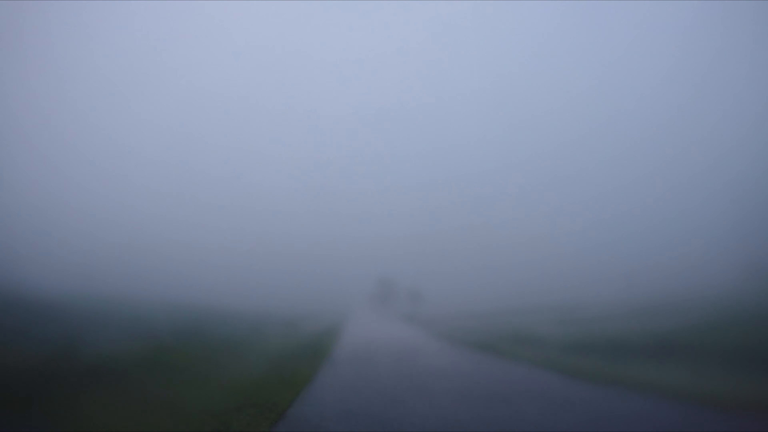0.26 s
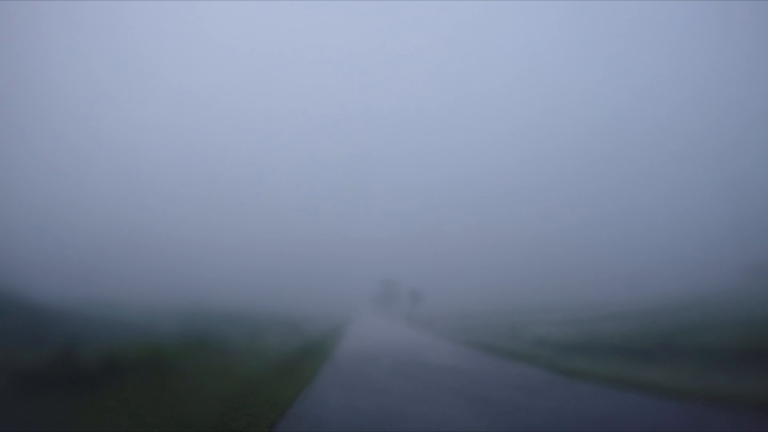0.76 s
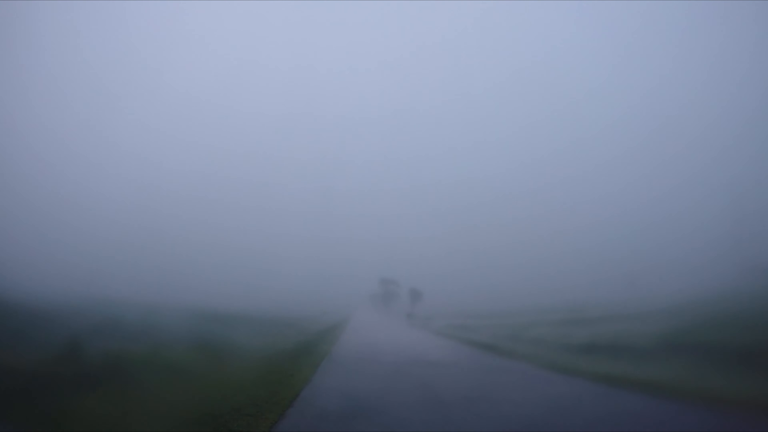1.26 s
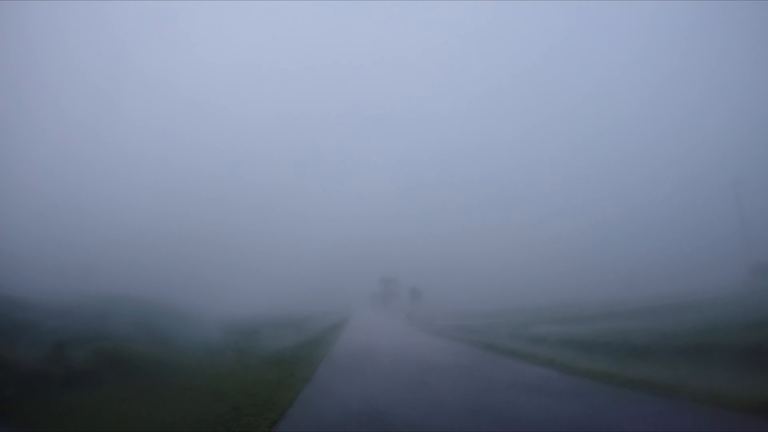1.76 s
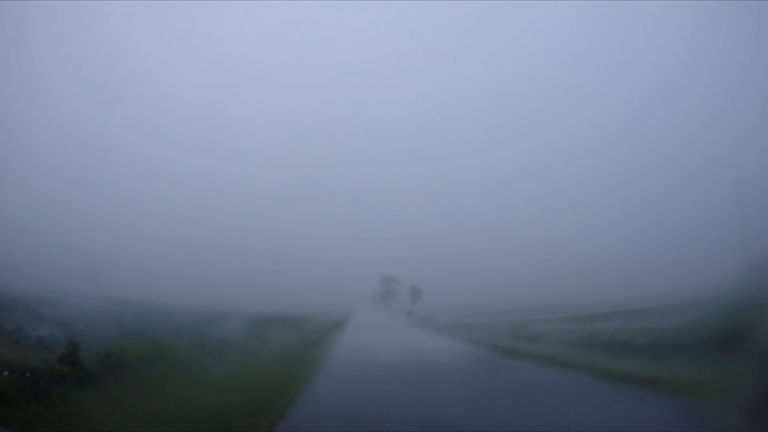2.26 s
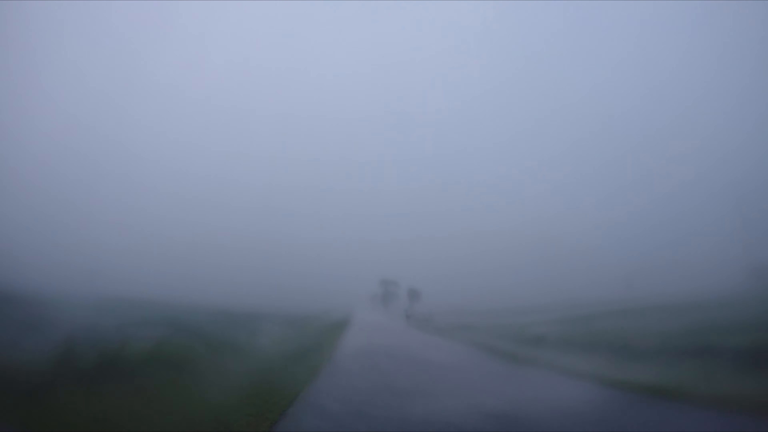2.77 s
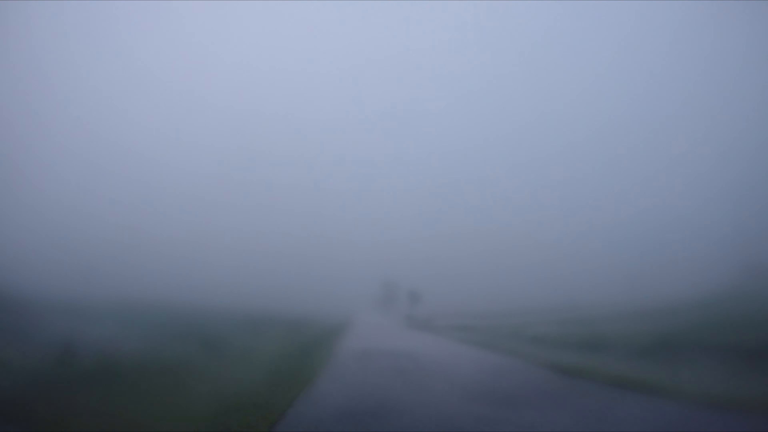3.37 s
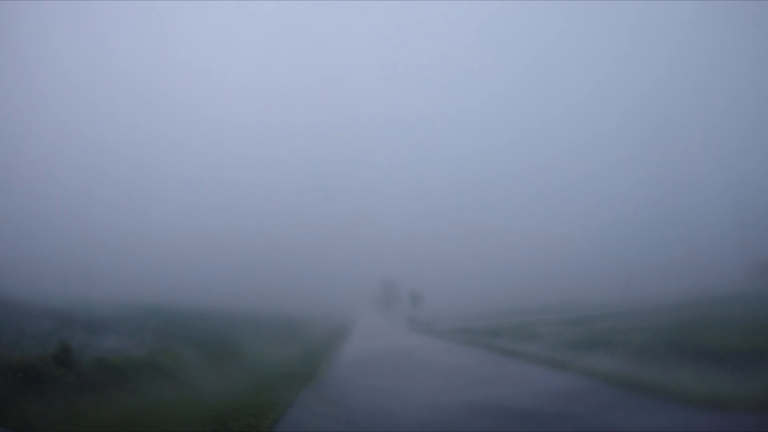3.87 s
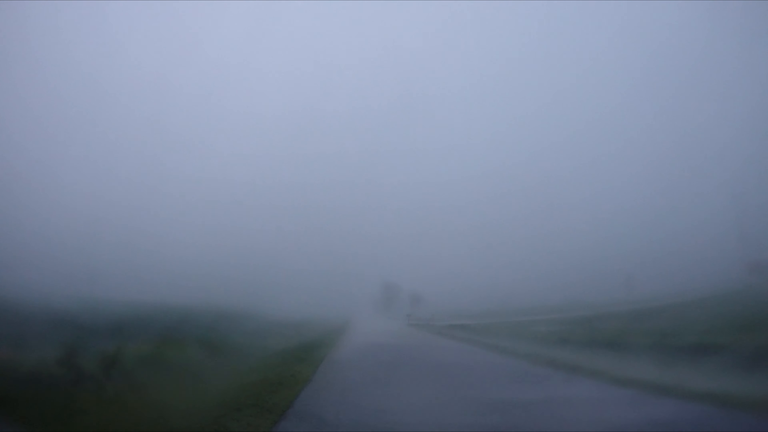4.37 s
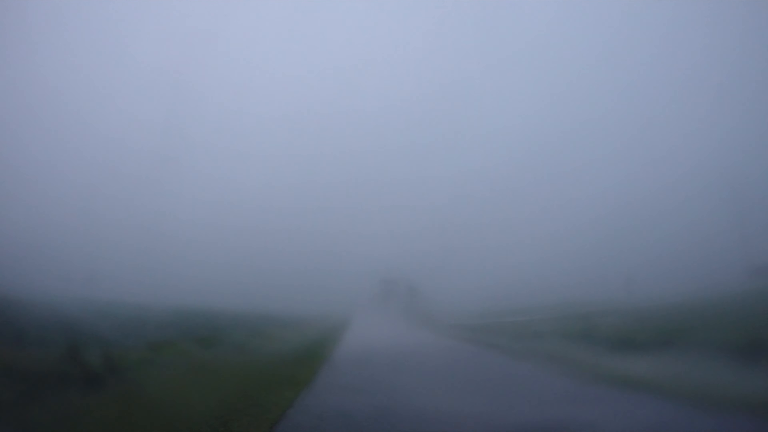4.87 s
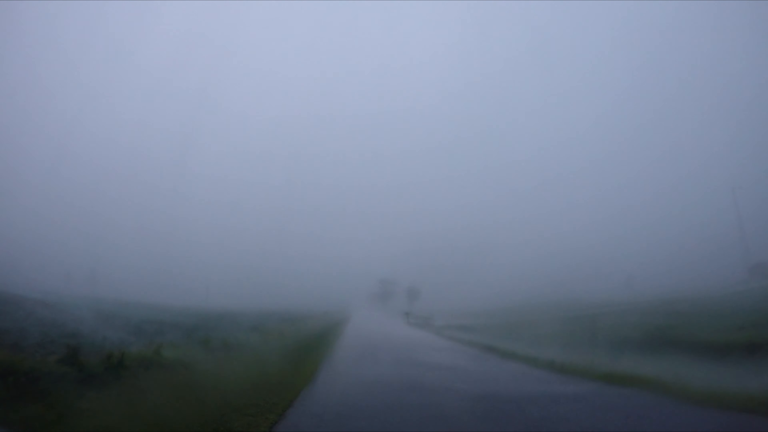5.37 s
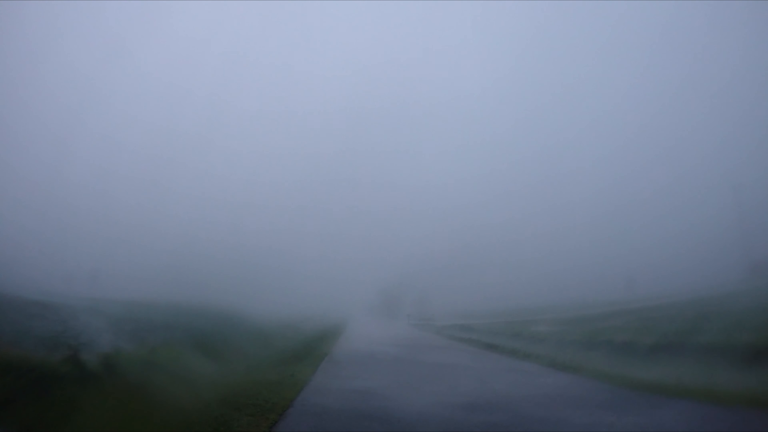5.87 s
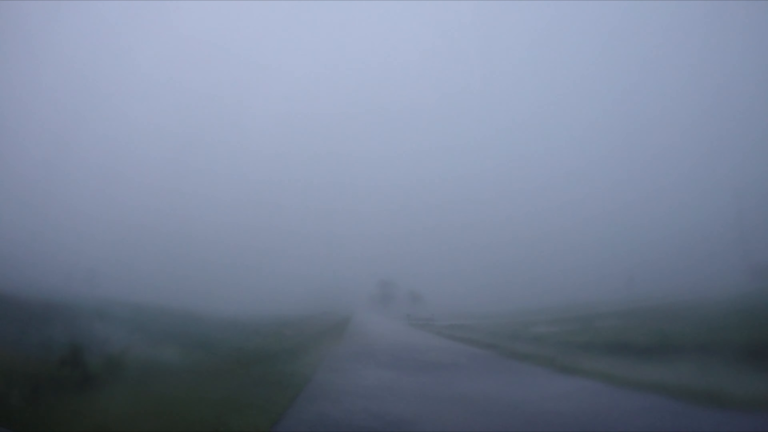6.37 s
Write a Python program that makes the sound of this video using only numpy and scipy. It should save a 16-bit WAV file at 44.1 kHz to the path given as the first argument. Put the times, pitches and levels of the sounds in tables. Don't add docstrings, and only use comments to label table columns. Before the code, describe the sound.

Rain heard from inside a parked car, close and dry, with no engine. From 0 to 1 s big drops smack the windscreen, bonnet and mount thickly and irregularly: bright crack, short woody knock around 2 kHz, some higher glassy ticks, a small bass thud under heavy ones. A low gust fades at the start. From 1 to 2.4 s hits are a little more spaced, with a very strong one near 1.9 s. A gust bumps at 2.5 s and drops crowd together until 3.8 s, with a dense patter burst near 3.4 s. About 3.9 to 4.3 s is thinner, with a brief faint whistle at 4.1 s. Gusts rumble and rush from 4.3 to 5.2 s under another hard cluster. Hits grow sparse from 5.6 to 6.2 s, leaving light taps and faint hiss; then wind swells and heavy knocks return until 6.6 s.

```python
import sys
import numpy as np
from scipy import signal
from scipy.fft import rfft, irfft
from scipy.io import wavfile

SR = 44100
rng = np.random.default_rng(int(sys.argv[2]) if len(sys.argv) > 2 else 0)


def transcribe(signal):
    frames = np.atleast_2d(signal).T
    limited = np.clip(frames, -1, 1)
    pcm = np.round(limited * 32767).astype(np.int16)
    wavfile.write(sys.argv[1], SR, pcm)


def undo_db(level):
    steps = np.asarray(level, float) / 20
    return 10 ** steps


N = 292383


def rms_one(x):
    return x / np.sqrt(np.mean(x ** 2) + 1e-20)


def in_time(rows):
    start_s, *columns = np.transpose(rows)
    return [np.interp(np.arange(N) / SR, start_s, column) for column in columns]


def drift(rate_hz):
    r = np.exp(-80 * np.pi * rate_hz / SR)
    noise = rng.standard_normal(N // 40 + 2002)
    slow = signal.lfilter([1], [1, -2 * r, r * r], noise)[2000:]
    return np.interp(np.arange(N) / 40, np.arange(len(slow)), rms_one(slow))


def coloured(x, spectrum):
    hz = np.maximum(np.arange(N // 2 + 1) * SR / N, 1)
    point_hz, point_db = np.transpose(spectrum)
    gain_db = np.interp(np.log(hz), np.log(point_hz), point_db)
    return irfft(rfft(x) * undo_db(gain_db), N)


def band(x, low_hz, high_hz):
    return signal.sosfilt(signal.butter(2, [low_hz, high_hz], "band", fs=SR, output="sos"), x)


def high_pass(x, order, hz):
    return signal.sosfilt(signal.butter(order, hz, "high", fs=SR, output="sos"), x)


def low_pass(x, order, floor_db, hz):
    return signal.sosfilt(signal.cheby2(order, floor_db, hz, fs=SR, output="sos"), x)


def impulses(start_s, sizes):
    at = np.clip(start_s * SR, 0, N - 1).astype(int)
    return np.bincount(at, sizes, N) + 1e-18


def ring(clicks, hz, t60_s):
    r, w = undo_db(-60 / (t60_s * SR)), 2 * np.pi * hz / SR
    return signal.lfilter([0, np.sin(w)], [1, -2 * r * np.cos(w), r * r], clicks)


# pitch_hz, level_db [dB per Hz]
RUMBLE_COLOUR = [(11, 3), (18, 29), (40, 23), (59, 7), (88, 9), (188, -1.5), (297, 1.5), (480, -29),
                 (600, -29), (780, -52), (1320, -120)]
# pitch_hz, level_db, t60_s
CABIN_BOOMS = [(32.94, 1.5, 1), (54.6, -1.5, 0.8), (77.3, -4, 0.18), (130.3, -14.5, 0.18),
               (301.6, -21.5, 0.22)]
# pitch_hz, level_db, t60_s
GAP_TONES = [(826, 3, 0.0099), (1053, 0.5, 0.025), (1612, -6, 0.02), (2080, 0.5, 0.0048), (2600, -2, 0.028)]


def wind(rumble_db, rush_db):
    white = rng.standard_normal((3, N))
    gust_db = np.minimum(rumble_db, -30)
    swell_db = gust_db + 38.5
    booms = 0
    for k, (hz, db, t60_s) in enumerate(CABIN_BOOMS):
        share = np.clip(1.15 - hz / 500, 0.4, 1)
        booms += undo_db(db - 38.5 + share * swell_db) * rms_one(ring(white[1 + k % 2], hz, t60_s))
    rumble_level_db = 3.9 * drift(3.0) - 43.5 + 0.79 * swell_db
    rumble = rms_one(coloured(white[0], RUMBLE_COLOUR)) * undo_db(rumble_level_db)
    low = high_pass(undo_db(-1.5) * booms + rumble, 2, 27)

    rush = 0
    for k, (hz, db, t60_s) in enumerate(GAP_TONES):
        flutter = undo_db(3 * drift(14))
        rush += undo_db(db) * flutter * rms_one(ring(white[k % 3], hz, t60_s))
    rush = low_pass(band(rush, 926, 2800), 8, 30, 2900)
    rush = high_pass(rush, 3, 660)
    return low + undo_db(np.maximum(rush_db, -50) - 2.5) * rms_one(rush)


# pitch_hz, level_db [dB per Hz]
SPRAY_COLOUR = [(1470, -11.5), (2500, -13), (3660, -10.5), (4840, -2), (6290, -17), (7190, -14),
                (15000, -18.5)]


def spray(level_db):
    hiss = rms_one(coloured(rng.standard_normal(N), SPRAY_COLOUR))
    flicker_db = 3.2 * drift(40) + 5.9 * drift(170)
    return (undo_db(level_db + flicker_db) + undo_db(-81.0)) * hiss


def splash(start_s, db, t60_s):
    fade = undo_db(-60 / (t60_s * SR))
    shape = signal.lfilter([1], [1, -fade], impulses(start_s, undo_db(db)))
    return shape * rng.standard_normal(N)


def spot_ring(start_s, db, hz, t60_at_2k_s, rise_ms, sag):
    t = np.arange(700) / SR
    luck = 0.7 + 0.6 * rng.random((len(start_s), 1))
    t60_s = t60_at_2k_s * luck * np.sqrt(2000 / hz[:, None])
    shape = (1 - np.exp(-t / (rise_ms / 1000))) * undo_db(-60 * t / t60_s)
    sine = np.sin(2 * np.pi * hz[:, None] * t * (1 + sag * (0.0015 - t)))
    tones = undo_db(db)[:, None] * shape * sine
    at = (start_s * SR).astype(int)[:, None] + np.arange(len(t))
    return np.bincount(at.ravel(), tones.ravel(), N + len(t))[:N]


# pitch_hz, level_db, t60_s
PANEL_MODES = [(291, -15.5, 0.061), (703, -24.5, 0.059), (852, -21.5, 0.046), (1080, -8.5, 0.022),
               (1557, -5, 0.018), (1910, 2, 0.0053), (2026, -7, 0.028), (2170, -1.5, 0.0042),
               (2655, -2.5, 0.016), (3183, -4.5, 0.011), (4180, -3, 0.0092), (4763, -1.5, 0.0078),
               (5520, -13, 0.011), (7110, -6.5, 0.0054)]


def panel(start_s, db, scatter_db, smear_ms):
    out = np.zeros(N)
    chance = rng.standard_normal((len(start_s), len(PANEL_MODES)))
    smear, side = rng.random((2, len(start_s), len(PANEL_MODES)))
    for k, (hz, mode_db, t60_s) in enumerate(PANEL_MODES):
        late_s = 0.45 / hz + smear_ms / 1000 * smear[:, k] ** 2
        sizes = undo_db(db + mode_db + scatter_db * chance[:, k]) * np.sign(side[:, k] - 0.5)
        out += ring(impulses(start_s + late_s, sizes), hz, t60_s)
    return out


def patter(level_db, spread_db, crack_db):
    draw = rng.random((6000, 2))
    start_s = draw[:, 0] * N / SR
    clump_db = 1.2 * drift(22)[(start_s * SR).astype(int)]
    size = np.minimum(-np.log(draw[:, 1] + 1e-9), 1.5)
    db = spread_db * size + clump_db
    rings = panel(start_s, db, scatter_db=5.5, smear_ms=0.8)
    burst_db = db + 4.8 * rng.standard_normal(len(start_s))
    cracks = band(splash(start_s, burst_db, t60_s=0.0012), 4900, 15700)
    lands_on = rng.integers(len(PANEL_MODES), size=len(start_s))
    spot_hz, spot_db = np.array(PANEL_MODES)[lands_on, :2].T
    pings = spot_ring(start_s, db + spot_db, spot_hz, t60_at_2k_s=0.0047, rise_ms=0.3, sag=2.4)
    mix = rms_one(rings) + undo_db(3.0) * rms_one(pings) + undo_db(crack_db) * rms_one(cracks)
    return undo_db(level_db) * mix


def big_drops(start_s, db, hz, crack_db, spread_db):
    crack = band(splash(start_s, db + crack_db + 0.2, t60_s=0.0025), 2370, 11560)
    body = band(splash(start_s, db + spread_db - 15.0, t60_s=0.02), 1280, 3750)
    spot_t60_s = 0.0076 * undo_db(-0.7 * spread_db)[:, None]
    spot = spot_ring(start_s, db - 0.8 - 1.27 * spread_db, hz, spot_t60_s, rise_ms=0.071, sag=1.9)
    modes = panel(start_s, db + 0.44 * spread_db - 12.5, scatter_db=3.0, smear_ms=0.7)
    return spot + modes + crack + body


# start_s, peak_db, crack_db [dB re peak]
ROOF_HITS = [
    (1.0583, -18.5, -10),
    (2.2708, -19, -24),
    (2.5498, -22, -1),
    (3.8174, -17, -14),
    (4.7214, -19, 3.5),
    (4.9797, -11.5, -6),
    (6.6255, -15.5, -19),
]
# start_s, peak_db, crack_db [dB re peak]
BONNET_HITS = [(0.077, -13.5, -24), (0.2271, -10.5, -15), (0.272, -15, -22), (0.5314, -31, 13),
               (0.5988, -18, -12), (0.8708, -18, -26), (1.2372, -12.5, -19), (1.2611, -13, -10),
               (1.6386, -9.5, -13), (2.1055, -11.5, -14), (2.174, -20, -3), (2.284, -17, -19),
               (2.5709, -5, -18), (2.8913, -12.5, -12), (3.159, -13.5, -17), (3.289, -17, -24),
               (3.4133, -18, -19), (3.425, -11, -28), (3.636, -11, -11), (4.021, -20, -7),
               (4.6764, -14.5, -15), (4.7919, -13, -3), (6.2676, -15.5, -28), (6.4764, -9.5, -8),
               (6.5001, -6, -31), (6.563, -11.5, -23.5)]
# start_s, peak_db, crack_db [dB re peak]
LOW_GLASS_HITS = [(0.0017, -11.5, -5), (0.195, -11, -13), (0.2751, -13, -19), (0.408, -6.5, -10),
                  (0.696, -9.5, -17), (0.92, -7, -31), (0.968, -8, -11), (1.1859, -10, -14),
                  (1.4158, -7, -16), (2.0841, -6, -12), (2.5359, -19, -7), (2.6315, -14, -8),
                  (2.7354, -17, -18), (2.8498, -9, -5), (2.905, -3, -21), (3.4053, -8.5, -7),
                  (3.5405, -13.5, -4), (3.7543, -16, -14), (4.218, -17, -31), (4.355, -13, -13),
                  (4.8113, -12, -2), (5.0287, -12, -19), (5.234, -17, -8), (5.3842, -11.5, -4),
                  (5.4842, -12.5, -19), (5.634, -11, -22), (5.65, -11, -10), (5.8978, -21.5, -17),
                  (6.5116, -4.5, -19), (6.552, -11, -13)]
# start_s, peak_db, crack_db [dB re peak]
CLEAN_GLASS_HITS = [(0.133, -11, -26), (0.259, -6.5, -18), (0.357, -5.5, -23), (0.428, -6, -24),
                    (0.6186, -4, -23), (1.0033, -18, -1), (1.141, -7.5, -6), (1.5746, -12.5, -9),
                    (1.794, -7.5, -11), (2.1296, -6, -15), (2.329, -7.5, -34), (2.594, -3, -7),
                    (2.742, -16, -26), (2.882, -4.5, -24), (2.9228, -8, 5), (2.9858, -8, -10),
                    (3.1687, -11.5, -19), (3.4679, -4.5, -27), (3.5195, -8, -5.5), (4.396, -3, -10),
                    (4.553, -3, -12), (4.607, -23, -19), (4.6657, -7.5, -10), (4.9574, -7.5, -22),
                    (5.0107, -12.5, -20), (5.0906, -4.5, -20), (5.491, -18, -13), (6.2331, -9.5, -5)]
# start_s, peak_db, crack_db [dB re peak]
SMEARED_GLASS_HITS = [(0.2845, -12, -18), (0.3073, -8.5, -5), (0.9387, -9.5, -27), (1.1798, -14.5, -5),
                      (1.245, -5, -31), (1.32, -9.5, -22), (1.37, -15, 0.5), (1.6179, -0.5, -35),
                      (3.0787, -13, -9), (3.0911, -2.5, 0), (3.1157, -14, 1), (3.3565, -7, -14),
                      (3.699, -8, -8), (3.8287, -12.5, -18), (4.3064, -18, 4.5), (4.352, -30, -21),
                      (4.564, -15, -12), (5.0744, -28.5, 11), (5.3503, -7, -2.5), (5.481, -16, -4),
                      (5.7196, -10.5, -11), (6.454, -6.5, -14)]
# start_s, peak_db, crack_db [dB re peak]
HIGH_GLASS_HITS = [(0.0716, -9.5, -0.5), (0.148, -3.5, -11), (0.491, -11, -3), (0.5845, -4.5, -7),
                   (0.61, -7.5, -27), (0.6398, -8, -24), (0.7155, -17, -6), (1.4429, -14, -3),
                   (1.4822, -9.5, -10), (1.9752, -12, -24), (2.0121, -9.5, -16), (2.076, -12.5, -17),
                   (2.1888, -6.5, -23), (2.3684, -8, -10), (2.3867, -9.5, -8), (2.4878, -11, -8),
                   (2.7555, -3.5, -3), (3.0448, -6.5, -15), (3.2732, -2.5, -14), (3.6491, -7, -17),
                   (4.0469, -9, -17), (4.852, -9, -5), (5.1163, -5, -8), (5.525, -16, -12),
                   (6.5755, -7, -23)]
# start_s, peak_db, crack_db [dB re peak]
MOUNT_HITS = [(0.1814, -13.5, -5.5), (0.2174, -10, -12), (0.2403, -11, -22), (0.3821, -21, 6.5),
              (0.547, -19, -9), (0.792, -21, -5), (0.7972, -4.5, -26), (1.1482, -17, -19),
              (1.305, -14.5, -21), (1.7805, -11, -6), (2.1603, -11.5, -9.5), (2.429, -20, -8),
              (2.5245, -12, -12), (2.605, -22, -3), (2.8324, -11.5, -5), (2.9559, -9.5, -7),
              (3.1465, -7, -9), (3.183, -15, -10), (3.199, -17.5, -16), (3.2206, -21, -0.5),
              (3.5127, -12.5, -25), (3.5317, -11.5, -22), (3.7943, -10, 0), (4.536, -17.5, -16),
              (4.6198, -11.5, -24), (0.7764, -13, -15), (4.7641, -9, -13), (4.845, -16.5, -4),
              (5.571, -18, -10), (5.621, -16.5, 1.5)]
# start_s, peak_db, crack_db [dB re peak]
RIM_HITS = [(0.3364, -11, -3), (0.4974, -18, 6), (0.5236, -10, -3), (0.8868, -18, -2), (1.586, -12, -7),
            (1.999, -10.5, 0), (2.9007, -5, -1), (3.1507, -6, -5), (3.3385, -13.5, 9.5), (4.3843, -20, 7),
            (4.414, -13, 1), (4.601, -1.5, -2), (4.8947, -4.5, 5), (4.9165, -18, -4), (4.947, -7, -12),
            (5.1299, -7.5, -15), (5.1512, -21, -8), (5.536, -14, -7)]
# pitch_hz, scatter_hz, spread_db [into the panel, dB re ring], shift_db [level]
SPOT_KINDS = [
    (1070, 11, 1.5, 5.5),
    (1686, 16, 1, 4),
    (1820, 33, 5.5, 0.5),
    (2070, 21, 2, -1),
    (2070, 12, 4.5, 0.5),
    (2700, 175, 4, -0.5),
    (4320, 82, -1.5, 5),
    (4790, 54, -1, -2),
]
# start_s, peak_db, pitch_hz, crack_db [dB re peak],
# spread_db [dB re ring]
HEAVY_DROPS = [(0.1147, -0.5, 2720, -13, -1.5), (0.2628, -0.5, 2080, -25, 3.5),
               (0.4698, -1.5, 1880, -18, 4.5), (0.553, -6, 4360, 6, -5), (0.7406, -2.5, 2700, -5, -1.5),
               (0.7737, 0.5, 2000, -11, 2), (1.0222, -3.5, 4200, -12, -3.5),
               (1.8281, -4.5, 4790.0, 3.5, 0.5), (1.9091, 3, 2740, -11, 1.5), (1.93, -4.5, 2700, -20, 9),
               (2.2121, 2, 4200, -15, -2), (2.703, -5.5, 4320, -7, -5), (2.8408, -7, 2720, -18, -6.5),
               (3.6677, -4, 4240, -7, -4.5), (3.711, -4, 1620, -9, 10), (3.7318, -1, 1990, -10, -0.5),
               (4.5187, -22, 4500, -12, 1), (4.3686, -4.5, 1990, -2, 7), (4.4593, -2.5, 4460, -9.5, -0.5),
               (4.6341, 0.5, 1980, -7, 2.5), (4.9415, 1.5, 2080.0, -13, 3.5), (5.1615, 2.5, 2600, 7, -3.5),
               (6.4292, 4, 1910, -22, 2.5), (6.5861, -6.5, 1070.0, -2, 13.5)]


def all_drops():
    rows = [np.transpose(HEAVY_DROPS)]
    spots = (ROOF_HITS, BONNET_HITS, LOW_GLASS_HITS, CLEAN_GLASS_HITS,
             SMEARED_GLASS_HITS, HIGH_GLASS_HITS, MOUNT_HITS, RIM_HITS)
    for hits, (hz, scatter_hz, spread_db, shift_db) in zip(spots, SPOT_KINDS):
        start_s, db, crack_db = np.transpose(hits)
        luck = rng.standard_normal((len(start_s), 2))
        heavier_db = db + 11.5
        spread = spread_db + 1.5 * luck[:, 1] - 0.1241 * heavier_db
        rows.append([start_s, db + shift_db, hz + scatter_hz * luck[:, 0], crack_db + 2, spread])
    return np.hstack(rows)


def thuds(start_s, db):
    luck = rng.standard_normal((len(start_s), 2))
    push_db = np.minimum(db, -1.5) + 1.2 + 1.7 * luck[:, 0]
    return band(impulses(start_s, undo_db(push_db) * np.sign(luck[:, 1])), 46, 374)


# start_s, peak_db, pitch_hz
DULL_DROPS = [(0.1274, -19, 1080.0), (0.1902, -17, 1590.0), (0.6866, -21, 2010.0), (0.7214, -16, 1490.0),
              (0.8033, -29, 2110.0), (0.8417, -30, 2440.0), (0.8791, -30, 2090.0), (0.9012, -23.5, 2260.0),
              (0.9256, -29, 2120.0), (0.9787, -25, 2070), (1.073, -22, 2020.0), (1.0781, -30, 2100.0),
              (1.154, -31, 2080.0), (1.2282, -22, 1610.0), (1.461, -18, 1640.0), (1.5358, -20, 2080.0),
              (1.629, -28, 4450.0), (1.8896, -22, 2110), (1.9015, -33, 2170.0), (2.0412, -26, 2060.0),
              (2.1132, -17, 1540), (2.3805, -24, 1920.0), (4.6097, -15, 1970), (2.481, -23, 2070),
              (2.6542, -24, 1940), (2.68, -33, 1740.0), (2.708, -33, 2160.0), (2.9195, -10.5, 1990),
              (2.8266, -20, 1700.0), (2.8557, -17.5, 1520), (3.0605, -14.5, 1720.0), (3.1912, -21, 2440.0),
              (3.25, -20, 2030.0), (3.2555, -21, 2130), (3.0565, -17.5, 1800), (3.374, -20, 2780.0),
              (3.4976, -27, 1520.0), (3.6188, -19, 1820.0), (4.2033, -21, 2000.0), (4.2488, -22.5, 1760),
              (3.7915, -18, 2600), (1.6355, -25, 1690), (4.8195, -24, 1900), (4.7017, -20, 2010.0),
              (4.8573, -15, 2210.0), (5.293, -26.5, 1070.0), (5.3305, -24, 2060.0), (3.3985, -16, 1900),
              (5.9449, -27.5, 2100.0), (6.0626, -25, 2050.0), (6.1418, -23.5, 2000), (6.198, -21, 2440.0),
              (6.321, -27, 1720.0), (6.3833, -21, 1610.0)]
# start_s, peak_db, pitch_hz
CRISP_DROPS = [(0.0513, -26, 1650.0), (0.0682, -15, 2070.0), (0.207, -21.5, 2100.0), (0.4247, -23, 2520.0),
               (0.436, -24, 2130.0), (0.5146, -21, 2080.0), (0.5357, -25, 1520.0), (0.659, -24, 5080.0),
               (0.6668, -13, 1490), (1.1105, -34, 4180.0), (0.0816, -17, 4600), (1.2745, -17, 2800),
               (1.4568, -22.5, 2010.0), (1.471, -23, 960.0), (1.4995, -21.5, 2080.0), (1.51, -23, 2670.0),
               (1.593, -26, 4960.0), (1.658, -19.5, 1080.0), (1.6915, -20, 970.0), (1.7284, -21.5, 1680.0),
               (1.7483, -26, 1980.0), (4.5125, -19, 4700), (1.884, -19.5, 2050.0), (1.9563, -24, 1830.0),
               (2.0216, -27, 1400.0), (2.154, -21, 1610.0), (2.2298, -24, 2590.0), (2.622, -25.5, 4910.0),
               (2.77, -18, 2170.0), (2.9437, -24, 1700.0), (2.977, -22, 4220.0), (2.983, -18, 2440.0),
               (3.322, -17, 2840.0), (3.3473, -23, 2000), (3.4438, -28, 2020.0), (3.5682, -23, 1910.0),
               (0.7075, -24, 4300), (3.811, -26, 4230.0), (4.1996, -22.0, 4950), (4.4192, -13, 1980.0),
               (4.486, -23, 1560.0), (4.5244, -13.5, 4870), (4.5736, -18, 1010.0), (4.868, -22, 2430.0),
               (5.0042, -20, 1990.0), (5.2274, -18, 2210.0), (5.2465, -20, 1820.0), (0.2855, -16, 4380),
               (3.589, -23, 4500), (5.6995, -24.5, 2110.0), (5.7704, -24, 2110), (6.1174, -25, 1640.0),
               (6.28, -20, 1910.0), (6.5311, -21, 1770.0)]
# start_s, peak_db, pitch_hz
SHARP_DROPS = [(0.045, -22, 2650.0), (0.3226, -22, 4740.0), (0.3467, -21, 4880.0), (0.3906, -17, 2730.0),
               (0.4416, -23, 1980.0), (0.5623, -19, 2650.0), (1.092, -23, 4220), (2.0066, -18, 4800),
               (1.3149, -22, 2190.0), (1.5707, -22, 4150.0), (2.862, -17, 4240), (1.917, -16, 1810.0),
               (1.99, -17, 4470.0), (2.0283, -22, 1810), (2.261, -22, 1610.0), (2.47, -19, 4540.0),
               (3.2585, -16, 6960), (2.6712, -25.0, 4610.0), (2.728, -21, 2060.0), (2.8764, -18, 2760.0),
               (2.9503, -19, 4860.0), (3.0658, -23.0, 2150.0), (3.0876, -17, 2500.0), (3.312, -16, 4450.0),
               (3.4485, -19, 2120.0), (3.474, -23, 1110.0), (3.597, -23, 1960.0), (3.654, -17, 4810.0),
               (3.8867, -24, 1100), (3.9062, -26, 2130.0), (4.7277, -21, 4800), (0.3675, -26, 4500),
               (4.4683, -18, 7000), (4.4716, -18.0, 4380.0), (4.4986, -18, 2060.0), (4.776, -10.5, 4600),
               (4.7875, -16, 2680.0), (4.8767, -22, 2120.0), (4.905, -22, 3140.0), (4.912, -16, 4540.0),
               (3.102, -27, 5500), (4.4763, -28, 9000), (5.111, -16, 2890.0), (1.475, -19, 4800),
               (5.199, -21.5, 4920.0), (5.211, -26.5, 1920.0), (5.3212, -20.5, 1880.0), (5.2644, -21, 4470),
               (5.4675, -28, 4690.0), (5.5799, -24, 1570), (5.7877, -20, 4420), (5.9617, -26, 1990),
               (6.031, -27, 2020.0), (6.2063, -21, 2000.0)]
# crack_db [dB re peak], spread_db [into the panel, dB re ring], shift_db [level]
LIGHT_KINDS = [
    (-30, 0, 3.5),
    (-13, 1, 4),
    (0, -0.5, 1),
]


def taps():
    rows = []
    for hits, (crack_db, spread_db, shift_db) in zip((DULL_DROPS, CRISP_DROPS, SHARP_DROPS), LIGHT_KINDS):
        start_s, db, hz = np.transpose(hits)
        same = np.ones(len(start_s))
        rows.append([start_s, db + shift_db, hz, crack_db * same, spread_db * same])
    return big_drops(*np.hstack(rows))


# middle_s, level_db
WHISTLE_PUFFS = [
    (4.086, -25),
    (4.315, -28.5),
    (4.77, -29),
]


def whistle():
    pitch_hz, width_ms = 1077, 5.6
    t = np.arange(N) / SR
    puffs = 0
    for middle_s, db in WHISTLE_PUFFS:
        puffs += undo_db(db) * np.exp(-0.5 * ((t - middle_s) * 1000 / width_ms) ** 2)
    return puffs * np.sin(2 * np.pi * pitch_hz * t)


# start_s, rumble_db
GUST_STRENGTH = [(0.0, -31.5), (0.09, -39), (0.24, -44.5), (2.44, -41), (2.49, -35.5), (2.82, -44.5),
                 (4.26, -37.5), (4.36, -31.5), (4.54, -35.5), (4.63, -30.5), (4.86, -38), (5.11, -34.5),
                 (5.24, -44), (5.41, -37), (5.61, -42.5), (6.02, -43), (6.35, -30), (6.63, -37)]
# start_s, patter_db, air_db [rush of air]
RAIN_STRENGTH = [(0, -47.5, -48), (.35, -40, -43), (.76, -36.5, -43), (.86, -41.5, -43),
                 (1.85, -43.5, -40.5), (2.12, -42, -44), (2.33, -48, -50.5), (2.85, -44.5, -39),
                 (3.1, -44.5, -45), (3.38, -29, -36.5), (3.47, -45, -43), (3.83, -34, -42.5),
                 (3.92, -45, -43.5), (4.45, -39, -38), (5.14, -35.5, -46.5), (5.2, -46, -45.5),
                 (5.9, -47, -44.5), (6.5, -38.5, -40)]


def scene():
    (rumble_db,) = in_time(GUST_STRENGTH)
    patter_db, air_db = in_time(RAIN_STRENGTH)
    rush_db = air_db + 0.71 * (rumble_db + 46)
    air = wind(rumble_db, rush_db) + spray(0.83 * patter_db - 15.5) + whistle()

    drops = all_drops()
    start_s, peak_db, _, _, spread_db = drops
    rain = big_drops(*drops) + patter(patter_db - 3.5, spread_db=9.5, crack_db=-8.5) + taps()
    push = thuds(start_s, peak_db + 0.53 * spread_db)
    thin = high_pass(rain, 4, 640)
    return (thin + undo_db(-20.0) * rain + push + air)[None]


def top_cut(x):
    return signal.sosfilt(signal.butter(12, 16500, fs=SR, output="sos"), x)


def record(dry):
    top = 0.47
    squeezed = dry / (1 + np.abs(dry / top) ** 5) ** (1 / 5)
    step = signal.sosfilt(signal.ellip(5, 0.3, 11, 15200, fs=SR, output="sos"), squeezed)
    mix = low_pass(step, 12, 45, 16900)
    return top_cut(mix)


dry = scene()
out = record(dry)
transcribe(out)
```